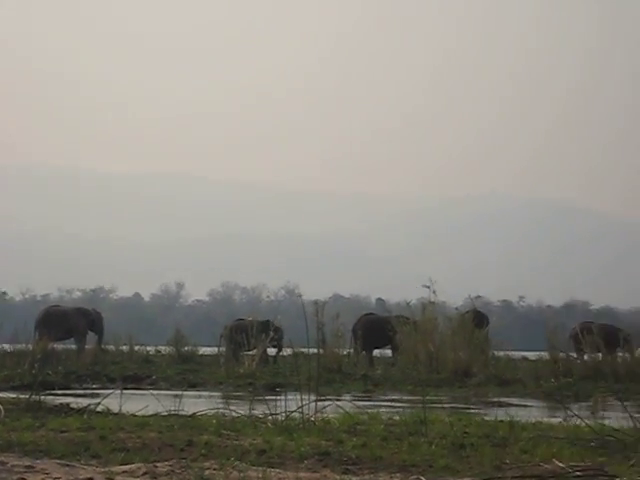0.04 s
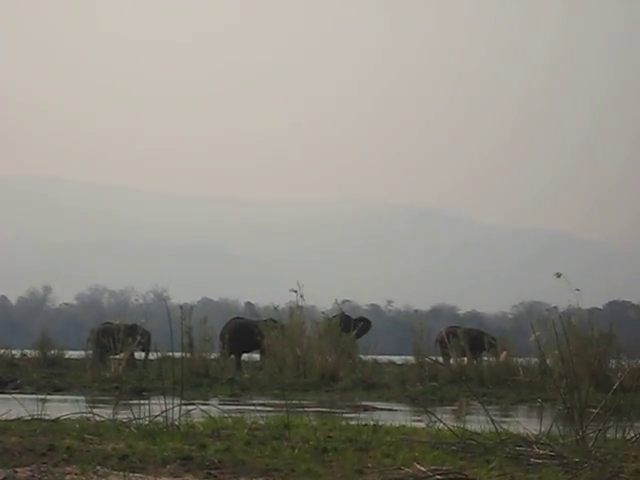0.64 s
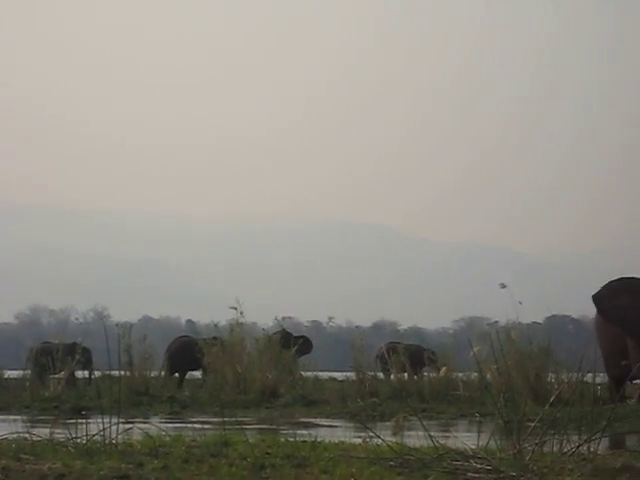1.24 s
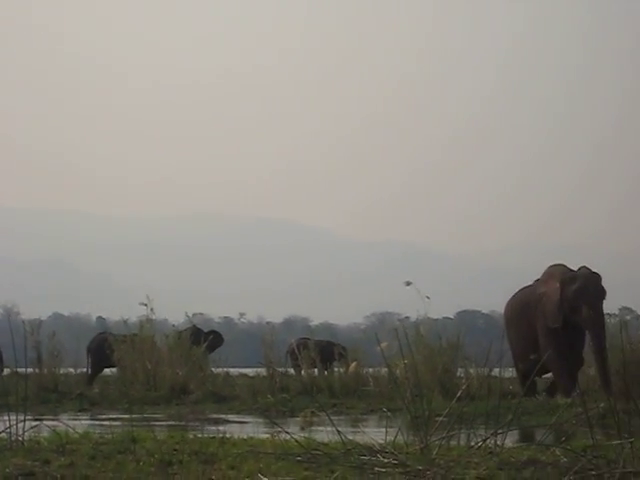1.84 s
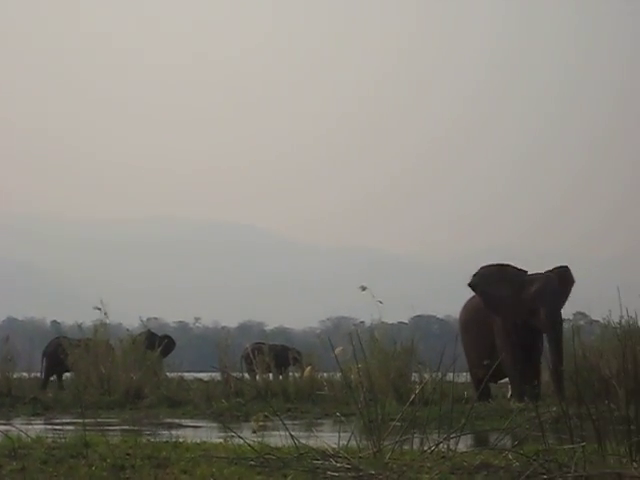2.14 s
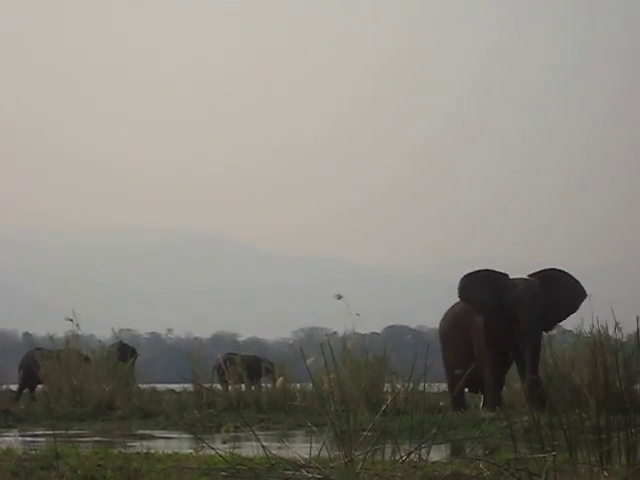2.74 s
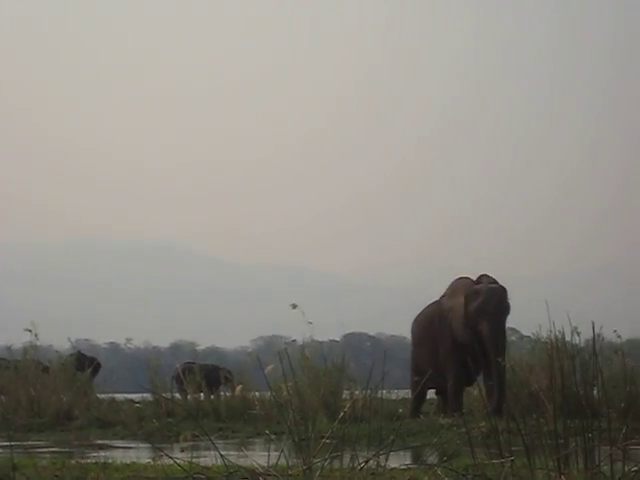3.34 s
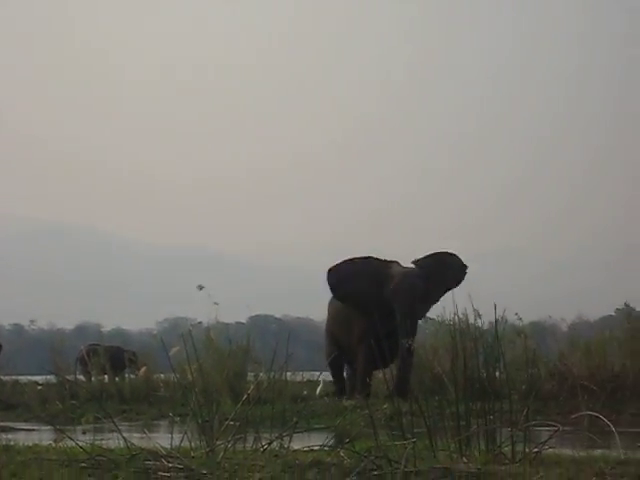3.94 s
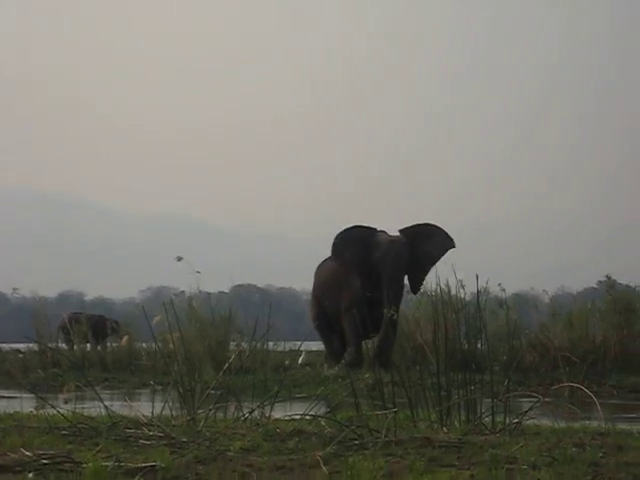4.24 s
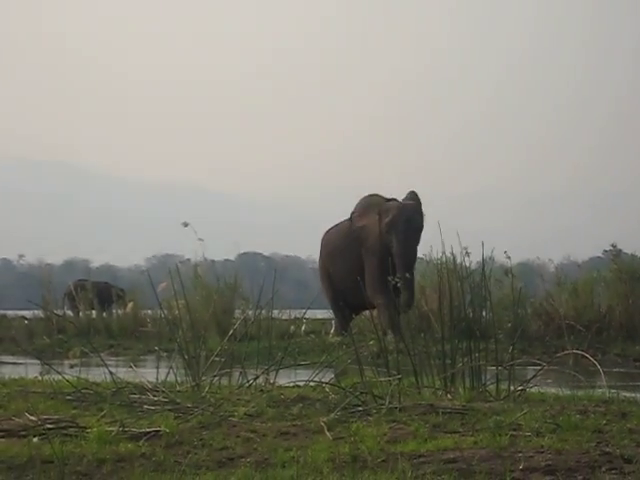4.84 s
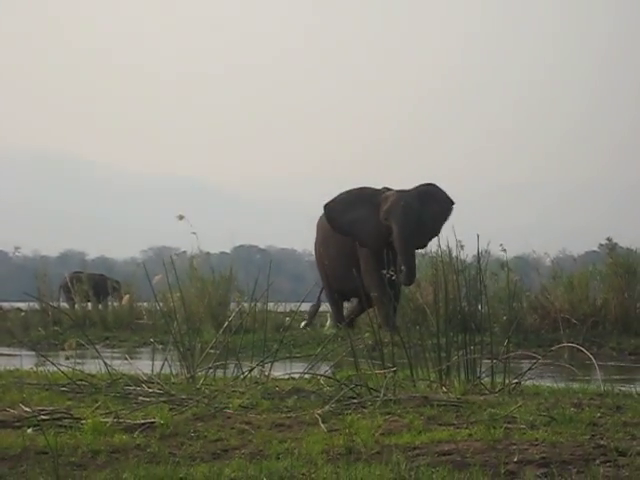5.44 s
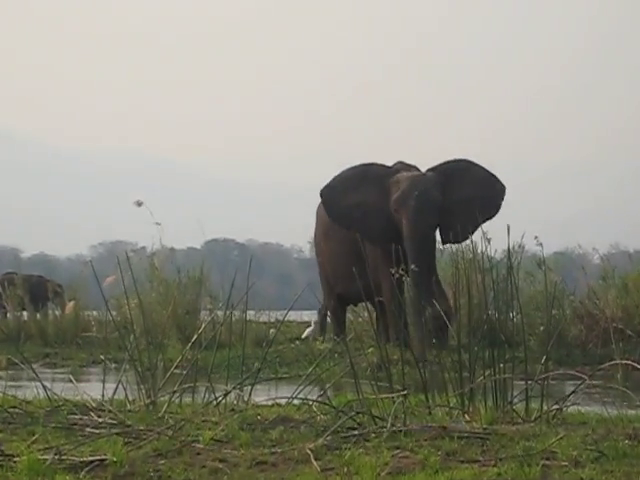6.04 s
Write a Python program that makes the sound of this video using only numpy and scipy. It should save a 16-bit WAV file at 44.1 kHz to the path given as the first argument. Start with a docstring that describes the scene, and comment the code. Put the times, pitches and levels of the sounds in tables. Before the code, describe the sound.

Wind thumps and rumbles against a camera microphone beside a river, building for a couple of seconds as dry stems rustle and waders chirp sharply. One rattling clack comes from the camera body, and the air settles. The brief chirps continue at uneven intervals with a slight echo, above a quiet river hush, distant sloshing, occasional stem ticks and the camera's low hum.

```python
"""Waders call on an open river bank, near and far: short chirps that arch in pitch through a resonant
throat, with a faint echo from the reeds. For three seconds a gust buffets the microphone, its eddies
landing as dull pops, and dry stems rustle; the camera housing clacks once. Then the air barely stirs,
and the birds call on over a few dry ticks, the hush and slosh of the river
and the hum and thin whine of the camera."""
import sys
import numpy as np
from scipy import signal
from scipy.fft import rfft, irfft
from scipy.io import wavfile
from scipy.ndimage import uniform_filter1d

SR = 44100
rng = np.random.default_rng(int(sys.argv[2]) if len(sys.argv) > 2 else 0)


def store_wav(level_fs):
    """Save 16-bit WAV to argv[1]."""
    pcm = np.round(np.clip(np.atleast_2d(level_fs), -1, 1) * 32767)
    wavfile.write(sys.argv[1], SR, pcm.T.astype(np.int16))


N = 268569
TIME = np.arange(N) / SR

CREST = 0.3  # share of a chirp's length at which its pitch tops out
CLIMB, DROP = 0.121, 0.51  # shares of the top pitch climbed before the crest and lost after it
LOCK, LOCK_WIDTH = 0.58, 0.075  # how firmly the throat holds the top pitch, and within what share of it
THROAT_DB = 24  # lift at the centre of the throat's resonance


def chirp(top_hz, length, tone_db, crest_db, fall_db, fade_db, attack_s=0.00074, release_s=0.0067):
    """The syrinx snaps open with a raspy flick, arches in pitch and gets richer and rougher as it falls."""
    t = np.arange(0, length, 1 / SR)
    progress = t / length
    to_climb = np.maximum(1 - progress / CREST, 0)
    fallen = np.maximum((progress - CREST) / (1 - CREST), 0)
    sag = CLIMB * np.sin(np.pi / 2 * to_climb) ** 2 + DROP * fallen ** 1.72
    pitch = 1 - sag * (1 - LOCK * np.exp(-(sag / LOCK_WIDTH) ** 4))
    jitter = (0.004 + 0.014 * fallen) * wobble(len(t), 850)
    rasp = 0.08 * np.exp(-t / 0.003) * wobble(len(t), 1030)
    flick = np.interp(t, [0, 0.0012, 0.003], [-0.35, 0.12, 0])
    phase = 2 * np.pi * np.cumsum(top_hz * pitch * (1 + flick + jitter + rasp)) / SR
    shimmer_db = 0.9 * wobble(len(t), 160)
    fundamental_db = tone_db + throat(pitch) - THROAT_DB - fade_db * progress ** 2 + shimmer_db
    tone = gain_of(fundamental_db) * np.sin(phase)
    # near the crest the 2nd harmonic meets the throat's upper resonance
    second_db = fall_db + (crest_db - fall_db) * np.exp(-((1 - pitch) / 0.14) ** 2)
    third_db = fall_db - 7.5 - 0.5 * fallen
    fourth_db = (fall_db + crest_db) / 2 - 20
    for k, db in enumerate([second_db, third_db, fourth_db], 2):
        # beak and air swallow the highest overtones
        loss_db = 7 * np.clip(np.log2(k * top_hz * pitch / 8500) * 4, 0, 1)
        flutter_db = 4 * wobble(len(t), 130)
        tone += gain_of(db + throat(k * pitch) - loss_db + flutter_db) * np.sin(k * phase)
    return tone * (1 - np.exp(-t / attack_s)) * np.clip((length - t) / release_s, 0, 1)


def throat(ratio, below_oct=0.63, above_oct=0.09):
    """Lift in dB around the top pitch (ratio 1): the fundamental falls out of it, the octave into it."""
    octaves = np.log2(ratio)
    width = np.where(octaves < 0, below_oct, above_oct)
    return THROAT_DB * np.exp(-(octaves / width) ** 2)


# The calls. Each row: start in seconds, top pitch in Hz, length in seconds, fundamental level in dB,
# 2nd harmonic at the crest in dB, overtones in the fall in dB before the throat lifts them,
# fade of the fundamental in dB (negative swells).
CHIRPS = [(-.043, 3490, 0.049, -8, -27, -32, 33), (0.125, 3522, 0.055, -13, -35, -38.5, 13),
          (0.749, 2940, 0.073, -36.5, -43.5, -43, 0), (0.79, 3500, 0.053, -12.5, -49, -33, 9),
          (0.998, 3505, 0.052, -13, -47, -35.5, 10), (1.627, 3464, 0.053, -16, -35.5, -37, 6),
          (1.861, 3570, 0.044, -50, -62, -41, -11), (2.636, 3540, .052, -26, -25, -37, 5),
          (2.741, 3470, .052, -16, -25.5, -33.5, 0), (2.7415, 2937, 0.064, -23.5, -31.5, -40.5, 8),
          (3.404, 3245, 0.06, -20.5, -23, -31, 2), (3.64, 2970, 0.055, -51, -64, -66, 11),
          (3.809, 2118, 0.05, -44, -28.5, -48.5, 8.5), (3.874, 2940, 0.061, -51, -68, -70, 15),
          (4.02, 3561, 0.056, -15, -36, -39.5, 1), (4.474, 3583, 0.058, -14.5, -25.5, -36.5, 1),
          (4.56, 3000, .062, -36.5, -62, -72.5, 8), (4.654, 2220, .052, -45, -33.5, -47, 15),
          (4.862, 3630, 0.059, -17, -23.5, -33.5, -6.5), (5.797, 3556, 0.059, -15, -27, -33, -1.5)]
# The reed bed's echo as the camera turns. Each row: time in seconds, echo send in dB.
ECHO_SEND = [(0, -34), (1.7, -22), (2.8, -23), (4.1, -23), (5, -19), (6.09, -19.5)]


def waders(scatter_db=-21.5, scatter_t60_s=0.44, echo_s=0.078):
    """The chirps, their thin scatter over the bank and one dull echo from the reed bed."""
    lead = SR // 10  # pre-roll for the chirp already under way at the start
    calls = np.zeros(lead + N)
    for start, *voice in CHIRPS:
        add(calls, start + lead / SR, chirp(*voice))
    t = np.arange(SR // 2) / SR
    tail = rng.standard_normal(len(t)) * gain_of(-60 * t / scatter_t60_s) * (t > 0.003)
    tail /= np.linalg.norm(tail)
    scatter = gain_of(scatter_db) * signal.fftconvolve(calls, tail)[:len(calls)]
    # thin stems throw back only the short waves, so the crest of each chirp rings on
    scatter = butter(scatter, 3250, "high", order=8)
    echo = butter(np.roll(calls, round(echo_s * SR)), 2600, "low", order=1)
    return (calls + scatter)[lead:] + echo[lead:] * gain_of(curve(ECHO_SEND))


def eddy(width_ms, skirt=7.6):
    """The pressure bump of a small vortex passing the microphone port, centred in 40 ms."""
    ms = np.arange(-SR // 50, SR // 50) * 1000 / SR
    return (1 + 1.93 / skirt * (ms / width_ms) ** 2) ** -skirt


# The gust's envelope. Each row: time in seconds, wind strength in dB.
GUST = [(0.0, -44.5), (0.18, -30), (0.33, -28.5), (0.39, -20), (0.45, -33), (0.55, -19.5), (0.62, -30),
        (0.89, -31), (0.95, -23.5), (1.06, -44), (1.11, -23), (1.14, -32), (1.19, -25.5), (1.55, -19),
        (1.59, -25), (1.63, -19), (2.26, -21.5), (2.27, -17), (2.51, -20.5), (2.6, -43), (2.85, -47.5),
        (2.89, -27), (3.08, -46.5), (3.3, -41.5)]
# The hardest-hitting eddies. Each row: time in seconds, level in dB before the boost,
# width in ms before the squeeze.
POPS = [(0.163, -13, 1.2), (.231, -13.5, 0.95), (.383, -8.5, 0.9), (0.545, -14.5, 6.1), (.676, -13.5, 1.7),
        (.773, -15, 1.05), (.913, -14, 1.09), (.949, -13, 1.3), (1.102, -5.5, 0.7), (1.112, -9.5, 0.82),
        (1.276, -3, 0.79), (1.348, -14, 0.97), (1.432, -11, .9), (1.516, -13.5, 0.81), (1.524, -5.5, 1.7),
        (1.547, -7, 0.71), (1.666, -6.5, 0.9), (1.755, -4, 1.7), (1.803, -5, 2.1), (1.814, -13, 0.67),
        (1.903, -1.5, 0.66), (1.991, -17.5, .7), (2.038, -13, 0.76), (2.08, -2, 0.78), (2.278, -8.5, 0.87),
        (2.283, -2, 0.81), (2.289, -4.5, 0.95), (2.377, -10, 0.82), (2.401, -6, 1.33), (2.497, -10.5, 0.67),
        (2.913, -19.5, .82), (2.975, -21, 1.24), (4.005, -26, 4.3)]


def wind(eddies_per_s=150, swarm_db=-2, pop_boost_db=3, pop_squeeze=0.9, calm_db=-53):
    """Strong eddies pop over a low rumble and a swarm of weak ones that tighten and churn in the gust."""
    gust_db = curve(GUST, right=calm_db)
    swarm, pops = np.zeros(N), np.zeros(N)
    lead_s = 0.02  # from the start of an eddy to its peak
    for time, db, width_ms in POPS:
        add(pops, time - lead_s, gain_of(db + pop_boost_db) * eddy(width_ms * pop_squeeze))
    arrivals = np.flatnonzero(rng.random(N) < eddies_per_s / SR)
    widths_ms = np.interp(gust_db[arrivals], [-45, -20], [3, 2.09])
    draws = rng.standard_normal((len(arrivals), 2))
    for sample, width_ms, (push, stretch) in zip(arrivals, widths_ms, draws):
        punch = push * np.exp(-0.14 * stretch)  # tight eddies hit harder
        add(swarm, sample / SR - lead_s, punch * eddy(width_ms * np.exp(0.47 * stretch)))
    # the microphone leaks steady pressure, so each bump swings back under zero
    swarm = butter(swarm, 70, "high", order=3)
    pops = butter(pops, 72, "high")
    swarm /= np.sqrt(abs(uniform_filter1d(swarm ** 2, size=3200)) + 1e-5)  # ride it to an even level
    # fine turbulence rides on each eddy and grows faster than the gust itself
    churn = noise([(150, -5.5), (350, 13.5), (560, 5.5), (800, -7), (1200, -16), (2500, -52)])
    churn *= uniform_filter1d(abs(swarm), size=130) * gain_of(1 + 0.83 * gust_db)
    rumble = noise([(15, -6), (42, 0), (80, -7), (160, -20), (400, -42), (2000, -70)]) * gain_of(-58)
    return pops + (swarm * gain_of(swarm_db) + churn) * gain_of(gust_db) + rumble


# The rustle's tone. Each row: frequency in Hz, relative level in dB.
RUSTLE_EQ = [(800, -18), (2000, 3.5), (3300, 5), (5200, 4), (7000, -10), (16000, -25)]
# The clearest stem cracks. Each row: start in seconds, peak in dB, band centre in Hz, decay in seconds.
TICKS = [(0, -34, 2960, 0.089), (.291, -36, 4070, 0.072), (.926, -31.5, 5000, 0.0043),
         (1.43, -28.5, 5660, 0.013), (2.344, -35, 5370, .015), (2.394, -31.5, 3180, .011),
         (3.478, -29, 6000, 0.0092), (4.107, -29, 4320, 0.0054), (4.41, -35, 2400, 0.01),
         (4.79, -36.5, 4470, 0.043), (5.021, -32, 5000, 0.0032), (5.395, -34, 2000, 0.014)]


def reeds(peak_s=2.29, rise_db_per_s=16, fall_db_per_s=64, crackle_db=3, small_ticks_per_s=1.3):
    """Dry stems rustle more as the gust builds, settle after it, and now and then tick."""
    past_peak = TIME - peak_s
    swell = gain_of(-49.5 + np.minimum(rise_db_per_s * past_peak, -fall_db_per_s * past_peak))
    stems = noise(RUSTLE_EQ) * (swell + gain_of(-68.5)) * gain_of(crackle_db * wobble(N, 87))
    small_starts = TIME[rng.random(N) < small_ticks_per_s / SR]
    small_ticks = [(start, -33, 6000, 0.004) for start in small_starts]
    for start, db, hz, decay_s in TICKS + small_ticks:
        t = np.arange(0, 3 * decay_s, 1 / SR)
        burst = rng.standard_normal(len(t)) * np.exp(-2 * t / decay_s)
        snap = butter(burst, [hz / 2, hz * 1.5], "band")
        add(stems, start, gain_of(db) * snap / abs(snap).max())
    return stems


# The tone of the steady bed and of the moving water. Each row: frequency in Hz, relative level in dB.
HUSH_EQ = [(100, -21), (210, -13), (330, -1), (600, 2), (1000, 1.5), (1500, -2), (2500, -2), (3900, -2),
           (5200, -6.5), (7500, -9.5), (10000, -7.5), (10800, -10), (11700, -6), (13000, -17), (14300, -13),
           (15800, -16)]
WATER_EQ = [(250, -30.5), (430, -5.5), (540, 4), (720, -0.5), (850, -7), (1000, -2), (1300, -7),
            (1700, -8.5), (3000, -28)]
# Water stirred far off. Each row: start in seconds, time until it fades in seconds, base level in dB.
SLOSHES = [(0, 0.064, -48), (2.966, 0.13, -49.5), (3.514, 0.036, -51.5), (3.914, .05, -52),
           (4.05, 0.025, -48), (5.201, 0.049, -47), (5.286, 0.277, -51)]


def river(hush_db=-49, lapping_db=-61, flicker_db=3.5, rise_s=0.0083, fade_s=0.026):
    """An even hush, with water lapping and sloshing far off, whose pitches come and go."""
    hush = noise(HUSH_EQ) * gain_of(hush_db)
    bands = signal.stft(noise(WATER_EQ), nperseg=1024)[2]
    patches = rng.standard_normal(bands.shape)  # brief boosts and dips across pitch and time
    patches = uniform_filter1d(uniform_filter1d(patches, size=3, axis=0), size=3, axis=1)
    bands = bands * gain_of(3 * unit_rms(patches))
    water = unit_rms(signal.istft(bands, nperseg=1024)[1][:N])
    stirred = np.zeros(N)
    for start, hold_s, db in SLOSHES:
        attack = np.clip((TIME - start) / rise_s, 0, 1)
        release = np.exp(-np.maximum(TIME - start - hold_s, 0) / fade_s)
        stirred += gain_of(db) * attack * release
    return hush + water * np.hypot(stirred, gain_of(lapping_db)) * gain_of(flicker_db * wobble(N, 32))


# The camera's low hum and thin whine. Each row: frequency in Hz, rms level in dB.
HUM = [(126.3, -49), (252.6, -68.5), (505, -75), (631, -78)]
WHINE = [(15122, -74), (15149, -72)]


def camera_hum():
    """The running camera gives off steady tones, each drifting slightly in phase."""
    return sum(np.sqrt(2) * gain_of(db) * np.sin(2 * np.pi * hz * TIME + 0.13 * wobble(N, 3.1))
               for hz, db in HUM + WHINE)


# The housing's ring. Each row: frequency in Hz, level in dB, time to fall 60 dB in seconds.
HOUSING_MODES = [(480, -26.5, 0.02), (603.3, -21.5, 0.05), (1010, -17, 0.057), (1270, -10.5, 0.013),
                 (1780, -9.5, 0.019), (1956, -44, 0.0074), (3994, -20.5, 0.011)]
# The hits within the clack. Each row: start in seconds, gain in dB.
CLACK_HITS = [(2.6457, -7.5), (2.647, 0), (2.6495, -11.5)]


def camera_clack():
    """Three hits in quick succession ring the housing and merge into one sharp, rattling clack."""
    t = np.arange(SR // 10) / SR
    ring = sum((-1) ** k * gain_of(db - 60 * t / t60) * np.sin(2 * np.pi * hz * t)
               for k, (hz, db, t60) in enumerate(HOUSING_MODES))
    clack = np.zeros(N)
    for start, db in CLACK_HITS:
        add(clack, start, gain_of(db) * ring)
    return clack


def gain_of(db):
    """Decibels to amplitude."""
    return 10 ** (np.asarray(db) / 20)


def unit_rms(x):
    """Scales to rms 1."""
    return x / np.sqrt(np.mean(x ** 2) + 1e-20)


def curve(rows, right=None):
    """An envelope through (seconds, value) points; `right`, if given, holds after the last."""
    return np.interp(TIME, *np.transpose(rows), right=right)


def add(mix, start_s, sound):
    """Lays a sound into the mix, trimming whatever overhangs."""
    start = round(start_s * SR)
    sound = sound[max(-start, 0):]
    part = mix[max(start, 0):][:len(sound)]
    part += sound[:len(part)]


def butter(x, edge_hz, kind, order=2):
    """Causal Butterworth filter."""
    sections = signal.butter(order, np.minimum(edge_hz, SR / 2 - 1), kind, fs=SR, output="sos")
    return signal.sosfilt(sections, x)


def wobble(size, rate_hz):
    """Smooth random modulation of rms 1, rolling off above the given rate."""
    hz = np.fft.rfftfreq(size, 1 / SR)
    return unit_rms(irfft(rfft(rng.standard_normal(size)) / (1 + (hz / rate_hz) ** 4), size))


def noise(eq):
    """Noise of rms 1, coloured by (Hz, dB) points."""
    hz, db = np.transpose(eq)
    colour_db = np.interp(np.log(np.fft.rfftfreq(N, 1 / SR) + 1), np.log(hz), db)
    return unit_rms(irfft(rfft(rng.standard_normal(N)) * gain_of(colour_db), N))


def scene():
    """All sources at one microphone."""
    return (waders() + wind() + reeds() + river() + camera_hum() + camera_clack())[None]


def record(dry):
    """The strongest pops overload the input; a steep low-pass then trims the very top."""
    clipped = np.clip(dry, -0.705, 0.705)
    low_pass = signal.firwin(511, 15950, window=("kaiser", 9), fs=SR)
    return signal.oaconvolve(clipped, low_pass[None], "same")


dry = scene()
out = record(dry)
store_wav(out)
```